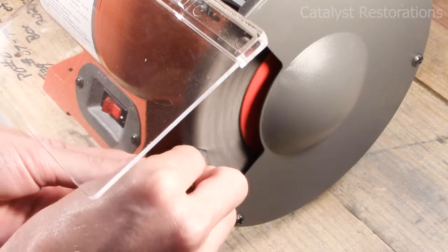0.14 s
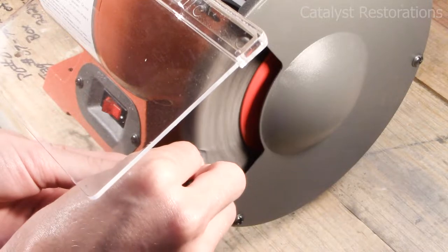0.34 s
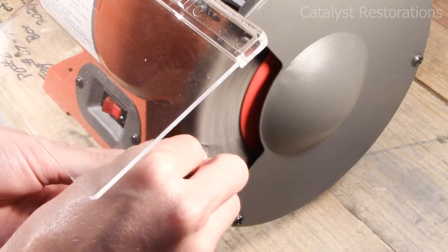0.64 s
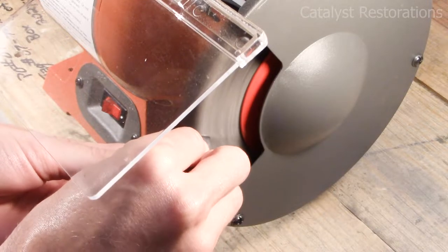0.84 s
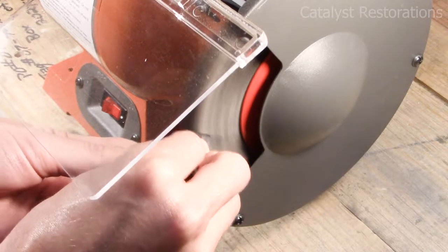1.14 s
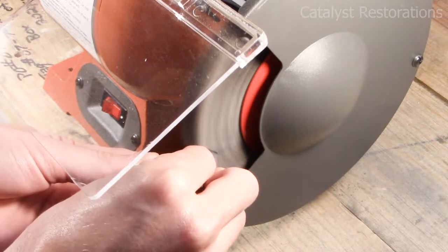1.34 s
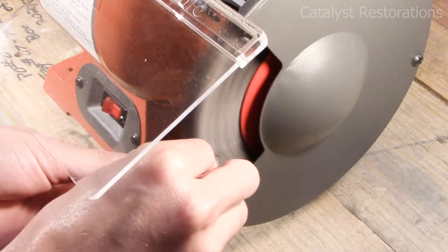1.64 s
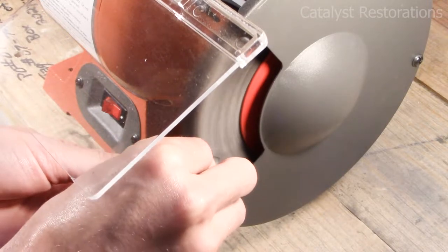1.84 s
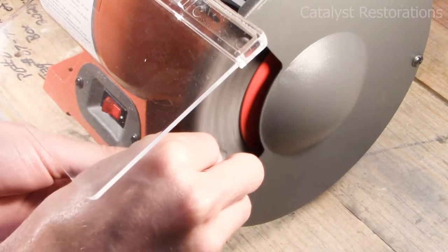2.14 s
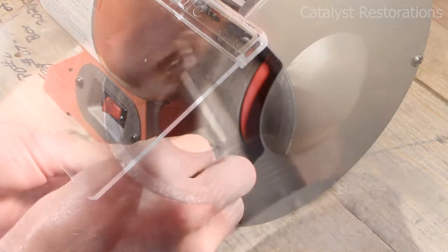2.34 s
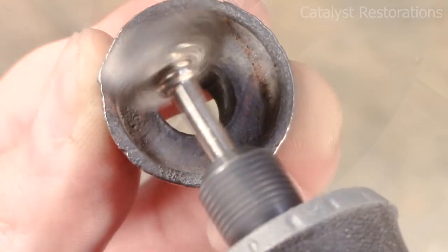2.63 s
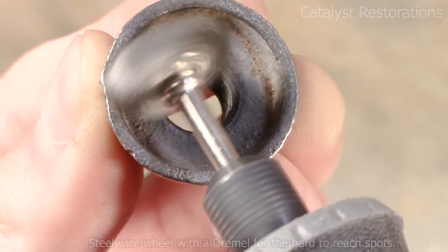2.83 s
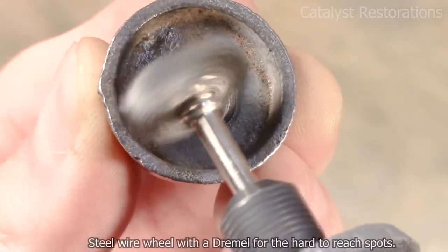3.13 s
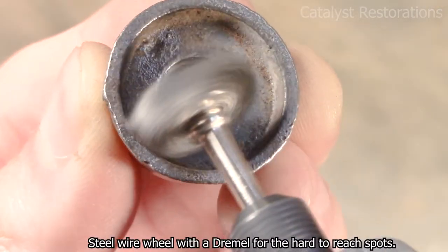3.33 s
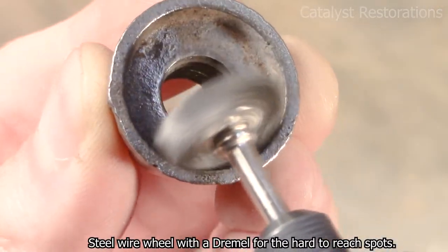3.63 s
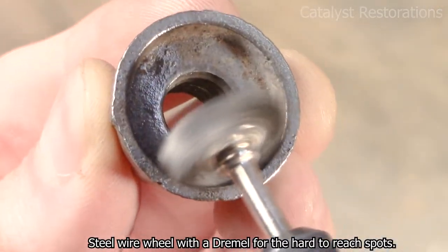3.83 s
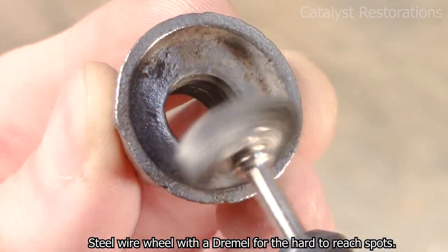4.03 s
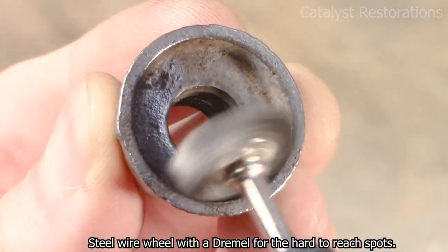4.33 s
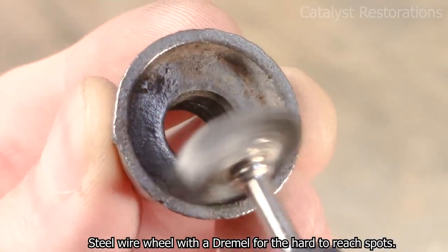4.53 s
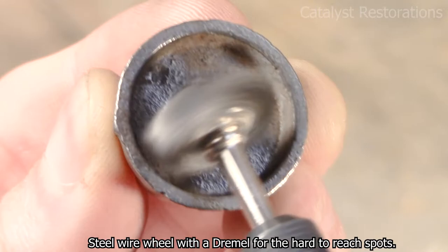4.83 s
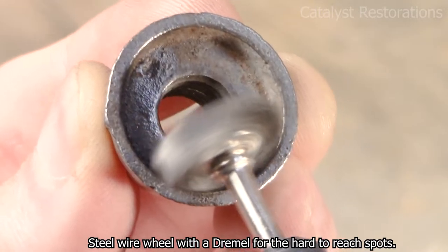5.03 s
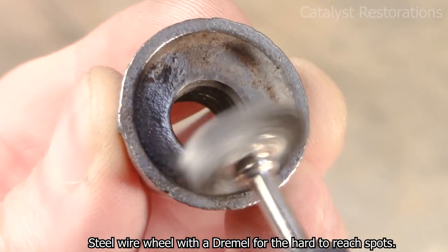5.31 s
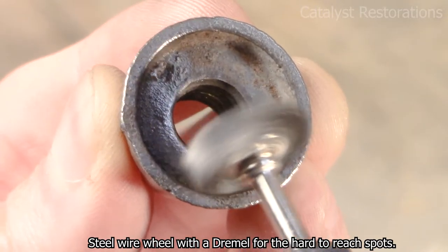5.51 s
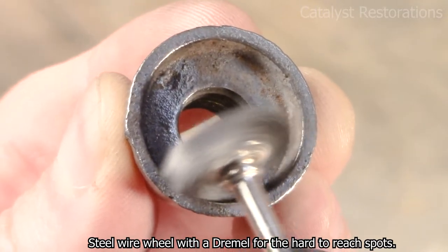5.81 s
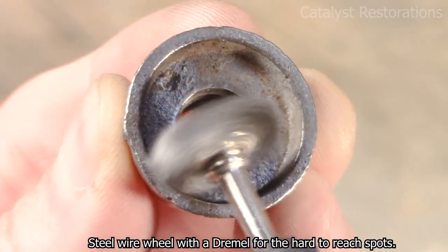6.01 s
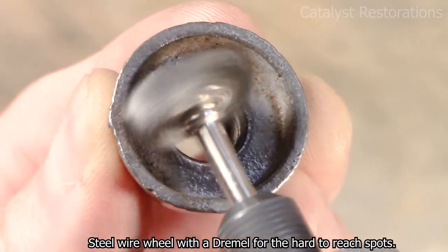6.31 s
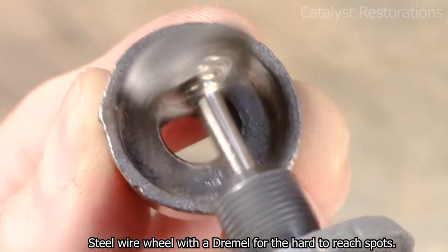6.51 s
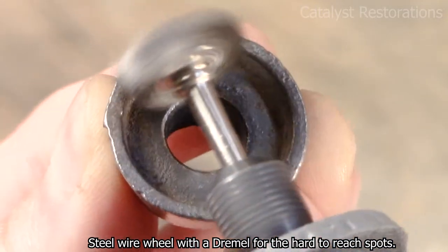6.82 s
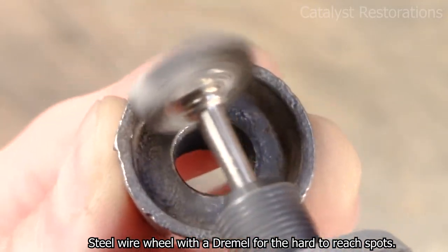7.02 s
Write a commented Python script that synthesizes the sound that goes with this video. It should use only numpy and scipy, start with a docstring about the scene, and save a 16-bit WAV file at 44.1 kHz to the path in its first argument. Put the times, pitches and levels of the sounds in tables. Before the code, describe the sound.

Close in a workshop, a bench grinder hums and whirs while a small steel part rasps on its wheel with bright gritty catches. After two seconds it crossfades into a high rotary tool whine, wavering in strength, with wires hissing and biting inside a steel cup. The brush turns harsher on the rim near the end. Soft draught puffs thump on the microphone.

```python
"""At a workshop bench, a small steel part is held against a grinder's wheel: motor hum, wheel tones, rasping grit.
The scene dissolves into a rotary tool brushing rust out of a steel cup with a wire wheel.
Rotating sources are sums of multiples of a shaft speed; rubbing is noise or tiny impacts, coloured or resonated.
The tool's fan whine sags under load and beats with its own echo, the wires hiss and bite,
and its draught now and then puffs on the microphone."""
import sys
import numpy as np
from scipy import signal
from scipy.fft import rfft, irfft
from scipy.io import wavfile
from scipy.ndimage import uniform_filter1d

SR = 44100
rng = np.random.default_rng(int(sys.argv[2]) if len(sys.argv) > 2 else 0)


def wrap_up_sound(samples):
    """Save the sound to the file named by the first command line argument, as 16-bit audio."""
    columns = np.atleast_2d(samples).T
    # keep every value between -1 and 1, then stretch to whole-number steps
    tamed = np.clip(columns, -1, 1)
    steps = np.round(tamed * 32767).astype(np.int16)
    wavfile.write(sys.argv[1], SR, steps)


N = 315754
TIME = np.arange(N) / SR
HZ = np.maximum(np.arange(N // 2 + 1) * SR / N, 1)

# rotation of the grinder wheel: (time [s], speed [turns per s])
WHEEL_SPEED = [(0.0, 55.52), (0.38, 55.02), (0.8, 55.02), (1.12, 55.69), (1.45, 55.75), (2.0, 56.03),
               (2.8, 57.55)]
# tones of the uneven wheel, before contact, settling and easing act on them:
# (multiple of the speed [1], earlier level [dB], later level [dB])
WHEEL_ORDERS = [(1, -63, -62), (2, -59, -59), (3, -59, -57), (5, -61, -58), (7, -57.5, -54),
                (8, -52.5, -62), (11, -62, -62), (12, -65, -67), (16, -63, -63), (17, -58, -57),
                (18, -55, -56), (19, -60, -58), (21, -66, -65), (24, -62, -67), (26, -57, -53),
                (27, -61, -61), (32, -57, -60), (33, -54, -58), (34, -55, -55), (35, -50, -56),
                (37, -60, -61), (38, -48.5, -52), (40, -59, -67), (44, -57, -66), (59, -60, -69),
                (62, -64, -60), (66, -67, -60), (67, -62, -57), (68, -57, -62), (70, -58, -64)]
# the balance of the wheel's tones changes: (time [s], share of the later balance [0 earlier, 1 later])
TONE_BALANCE = [(.9, 0.057), (1.2, 1)]
# pressing on the wheel: (time [s], relative shaking [dB], relative cutting [dB])
PRESS = [(0.0, -44, -46), (0.04, -40, -46), (0.59, -42.5, -47), (0.79, -42, -45.5), (1.07, -46, -47),
         (1.99, -42.5, -48.5), (2.13, -46, -48.5), (2.3, -43, -49)]
# contact with the wheel, lost as the part leaves it: (time [s], level [dB])
CONTACT = [(0, -1), (2.25, 1.5), (2.42, 2), (2.56, -6.5), (3, -4)]
# an edge of the part catches the grit: (time [s], extra grit level [dB], half length [s])
CATCHES = [(.79, 4, .03), (.93, 3, 0.048), (1.07, 2.5, 0.049), (1.23, 1.5, .02), (1.46, 4, 0.042),
           (1.58, 2.5, .02), (1.75, 2, .02), (2.02, 4, 0.029), (2.14, 2, .025)]
# resonances of the guard, the part and the part's treble: (frequency [Hz], width [Hz], relative level [dB])
GUARD = [(381, 33, 0), (610, 39, -1), (989, 110, -6.5), (1437, 106, 2), (1847, 290, -3), (2153, 164, -0.5)]
PART = [(3067, 100, -4.5), (3257, 59, -2), (3600, 100, -9.5), (3660, 54, 2.5), (3848, 54, 3.5),
        (4436, 86, 1.5), (4870, 200, -5), (5520, 230, -6.5), (5760, 120, -7), (6330, 250, -7),
        (6930, 260, -7)]
PART_TREBLE = [(7750, 160, -2.5), (8200, 140, -0.5), (8770, 150, -0.5), (9700, 220, -0.5),
               (10580, 260, -5.5), (11260, 420, -3), (12540, 350, -4), (12700, 300, -2), (14100, 460, -7)]
# spectral shapes of air in the guard, rasp and flying grit: (frequency [Hz], relative level per Hz [dB])
WINDAGE = [(30, -38), (80, -35), (140, -1), (230, -0.5), (400, 3.5), (500, 4), (660, 7.5), (800, -1.5),
           (1000, 0), (1200, -19), (1300, 4), (1620, -2), (2500, -17.5), (4000, -9.5), (9000, -16.5)]
RASP = [(700, -13.5), (1500, -1.5), (2400, 0.5), (2750, -1.5), (3300, 1.5), (5000, -3), (6500, -8.5),
        (7400, -8.5), (12000, -36)]
GRIT = [(3000, -18), (6000, 6), (7400, -16), (11000, -0.5), (13000, -6), (14400, -12), (15600, -22)]
# spray of grit: base level [dB], share of the cutting's swing [1], scale of the wheel's bounce [dB]
GRIT_DB, GRIT_FOLLOWS, BOUNCE_DB = -51.5, 0.64, 1.6
# the hand eases off: start [s], time taken [s], loss of the finer bumps per octave of the multiple [dB]
EASE_AT_S, EASE_S, EASE_LOSS_DB = 1.96, 0.18, 3
# the part settles onto the wheel: time taken [s], loss of the finer bumps at first [dB]
SETTLE_S, SETTLE_DB = .3, 4
# short reflections from bench, hand and walls: (delay [s], level [dB])
REFLECTIONS = [(.00095, -25), (.0017, -25), (.0031, -23), (.0041, -24), (.0052, -24), (.0071, -24)]

MAINS_HZ = 60
# steady motor hum: (multiple of the mains [1], level [dB])
HUM_ORDERS = [(2, -71.5), (4, -72.5), (6, -71), (12, -75)]
# growing hum at the tenth mains multiple: level at the start [dB], growth [dB per s]
HUM_DB, HUM_DB_PER_S = -60.5, 4.8

# rotation of the rotary tool, before the sag of single bites: (time [s], speed [turns per s])
TOOL_SPEED = [(2.15, 383.9), (2.4, 378.8), (2.68, 378.5), (3.44, 383.9), (3.8, 383.6), (3.99, 378.1),
              (4.49, 370.8), (4.71, 369.4), (4.98, 376.0), (5.22, 373.0), (5.31, 371.0), (5.69, 369.3),
              (5.94, 370.9), (6.22, 374.0), (6.43, 380.6), (6.63, 383.3), (6.81, 382.4), (7.16, 373.9)]
# speed under a usual load [turns per s]
WORKING_SPEED = 372
# the wires bite into the cup: (time [s], relative strength [1], half length [s])
BITES = [(4.09, 0.31, 0.039), (4.34, 0.82, 0.068), (4.54, 0.8, 0.063), (4.78, 1, .075), (5.01, 0.3, .04),
         (5.17, 0.7, .07), (5.37, 0.94, 0.064), (5.56, 0.57, .05), (5.86, 0.43, 0.14), (6.14, .6, 0.093),
         (6.48, 0.83, 0.098), (6.97, .7, .08), (7.15, .8, 0.057)]
# sag in a full bite [turns per s], span of the running mean that it is taken against [s]
BITE_SAG, RECOVER_S = .5, .25
# fan whine: direct level [dB], strength of its echo [share]
WHINE_DB, WHINE_ECHO = -48.8, .72
# mean detour of that echo [m], speed of sound [m per s]
ECHO_PATH_M, SOUND_M_PER_S = 2.7, 343
# the moving hand changes the detour: (time [s], shift [mm])
ECHO_SHIFT = [(2.25, -23.5), (2.55, -22.5), (2.85, -14.0), (3.3, -18.0), (3.85, -19.9), (4.2, -17.8),
              (4.7, -12.9), (5.25, -13.1), (5.85, -7.8), (6.4, -13.3), (6.75, 8.9), (7.1, -15.0)]
# tones of unbalance, commutator and wire chatter: (multiple of the speed [1], relative level [dB])
UNBALANCE_ORDERS = [(1, 0), (7, 4), (36, -10)]
COMMUTATOR_ORDERS = [(2, -16), (4, -13), (8, 1), (9, -9.5), (14, -13), (15, 0.5), (16, -9), (17, -12),
                     (19, -17)]
CHATTER_ORDERS = [(2, -17), (5, -2.5), (6, -1.5)]
# one row for each of those three families:
# (base level at working speed [dB], growth [dB per extra turn per s], gain in a full bite [dB])
TONE_LAWS = [(-70.5, 0.45, -5.5), (-59.5, 0.29, 4), (-70, 0.11, 12.5)]
# slow gain on all these tones: (time [s], level [dB])
TONES_LEVEL = [(2.4, 2), (3.1, 1.5), (3.7, -1.5), (6.1, 0), (6.5, 1.5), (7.15, 0.5)]
# spectral shapes of rushing air, wires and wire tips: (frequency [Hz], relative level per Hz [dB])
AIR = [(200, -43.5), (330, -29), (520, -22.5), (700, -19.5), (900, -10.5), (1150, -17), (1600, -12.5),
       (2050, -16.5), (2700, -11.5), (5100, -10), (5600, -1), (6200, -3.5), (7400, -9), (9000, -14),
       (11500, -19.5), (15500, -37)]
WIRES = [(1500, -27), (3000, -30), (3800, 10), (4500, -2.5), (5200, 6), (7000, 3.5), (8500, -3),
         (11000, -31)]
TIPS = [(7000, -17.5), (9000, -2.5), (11200, 0.5), (12500, 0), (13400, -6), (14400, -14), (15600, -20)]
# resonances of the steel cup, lowest first: (frequency [Hz], width [Hz], relative level [dB])
CUP = [(4410, 490, -2.5), (4660, 57, 5.5), (4880, 170, -1), (5900, 300, -2), (7570, 140, -5.5),
       (8800, 110, -18), (9900, 100, -16), (12000, 90, -9.5), (12580, 260, -13), (13200, 160, -19),
       (14140, 120, -21)]
# base levels of air, wires, ringing cup and wire tips [dB], unsteadiness of the hand [dB]
AIR_DB, WIRES_DB, CUP_DB, TIPS_DB, HAND_DB = -45, -57, -55.5, -61.5, 0.44
# the brush rides up onto the rim: middle [s], half length [s], rise of wires, cup, tips and air [dB]
RIM_AT_S, RIM_S, RIM_WIRES_DB, RIM_CUP_DB, RIM_TIPS_DB, RIM_AIR_DB = 6.81, .13, 3, 6, 2.5, .8
# there the cup's lowest modes sing out [dB]
RIM_RING_DB = -48.5

# puffs of draught: (time [s], relative thump [dB], relative flutter [dB], nominal length [s])
PUFFS = [(3.781, -56, -58, 0.042), (3.943, -60, -76, 0.052), (4.073, -65, -86, 0.04),
         (4.235, -70, -93, 0.055), (4.39, -60, -74, 0.045), (4.456, -61, -81, 0.022),
         (4.659, -68, -81, 0.078), (4.783, -59, -81, 0.061), (4.893, -64, -83, 0.041),
         (5.181, -55, -69, 0.034), (5.291, -57, -78, 0.054), (5.442, -61, -76, 0.05),
         (5.731, -54, -71, 0.03), (5.974, -49, -72, 0.033), (6.03, -60, -72, 0.04),
         (7.022, -65, -69, 0.027)]
# spectral shapes of thump and flutter: (frequency [Hz], relative level per Hz [dB])
PUFF_COLOUR = [(10, -19), (22, 5.5), (38, 2), (60, -0.5), (85, -10.5), (120, -35), (400, -61)]
FLUTTER_COLOUR = [(50, -23), (90, 6.5), (145, 0), (190, -25), (300, -40), (600, -65)]
CUTOFF_HZ = 15750


def from_db(db):
    """Level law: twenty decibels are a tenfold amplitude."""
    return 10 ** (np.asarray(db) / 20)


def rms_one(x):
    """Normalisation: a signal divided by its effective value has unit power."""
    return x / np.sqrt(np.mean(x ** 2) + 1e-20)


def in_time(rows):
    """Linear interpolation: each column of a time table becomes a curve, sample by sample."""
    s, *columns = np.transpose(rows)
    return [np.interp(TIME, s, c) for c in columns]


def swells(rows):
    """Superposed Gaussian pulses: a smooth rise and fall for each (time, height, half length)."""
    return sum(height * np.exp(-((TIME - s) / length) ** 2) for s, height, length in rows)


def noise():
    """White noise: independent samples carry equal power per Hz."""
    return rng.standard_normal(N)


def drift(rate):
    """Lowpass-filtered chance: two equal poles at `rate` Hz leave a slow wander of spread 1."""
    step = 40   # samples between the computed points
    r = np.exp(-2 * np.pi * rate * step / SR)
    chance = rng.standard_normal(N // step + 2002)
    slow = signal.lfilter([1], [1, -2 * r, r * r], chance)[2000:]   # the filter has settled
    return np.interp(np.arange(N) / step, np.arange(len(slow)), rms_one(slow))


def coloured(x, points):
    """Spectral shaping: weighting each frequency gives a smooth spectrum; rms 1."""
    hz, db = np.transpose(points)
    gain = from_db(np.interp(np.log(HZ), np.log(hz), db))
    return rms_one(irfft(rfft(x) * gain, N))


def resonate(x, modes):
    """Modal superposition: parallel damped resonances of alternating sign; rms 1."""
    out = 0
    for k, (hz, width, db) in enumerate(modes):
        r = np.exp(-np.pi * width / SR)
        poles = [1, -2 * r * np.cos(2 * np.pi * hz / SR), r * r]
        mode = (1 - r * r) * signal.lfilter([1, 0, -1], poles, x)
        out = out + (-1) ** k * from_db(db) * mode
    return rms_one(out)


def grains(per_s, spread_db):
    """Shot noise: tiny impacts of uneven size and either sign at random moments; rms 1."""
    struck = rng.random(N) < per_s / SR
    size = from_db(spread_db * np.clip(noise(), -2, 2))
    return rms_one(struck * size * np.sign(noise()))


def tone(turns, order, waver):
    """Harmonic of a rotation: one multiple of its angle, unsteady in strength and phase."""
    angle = 2 * np.pi * (order * turns + rng.random())
    in_phase = (1 + waver * drift(6.4)) * np.sin(angle)
    quadrature = waver * drift(10.6) * np.cos(angle)
    return np.sqrt(2 / (1 + 2 * waver ** 2)) * (in_phase + quadrature)


def wheel_face(turns, repeat, size=800):
    """Cyclic roughness: the same bumps return on every turn, mixed by power with fresh chance."""
    bumps = np.interp(turns % 1 * size, np.arange(size), rng.standard_normal(size))
    repeat = np.clip(repeat, 0, 1)
    return np.sqrt(repeat) * rms_one(bumps) + np.sqrt(1 - repeat) * noise()


def among_surfaces(x):
    """Comb interference: faint echoes off nearby surfaces ripple the spectrum of a hiss."""
    echoes = sum(from_db(db) * np.pad(x, (round(abs(delay) * SR), 0))[:N] for delay, db in REFLECTIONS)
    power = 1 + sum(from_db(2 * db) for delay, db in REFLECTIONS)
    return (x + echoes) / np.sqrt(power)


def wheel_tones(turns, shake, count=5):
    """Forced vibration: unbalance drives the lowest multiples; the higher ones grow with contact."""
    later_share, = in_time(TONE_BALANCE)
    ease_db = -EASE_LOSS_DB * np.clip((TIME - EASE_AT_S) / EASE_S, 0, 1)
    settled = from_db(-SETTLE_DB * np.clip(1 - TIME / SETTLE_S, 0, 1))
    unbalance, bumps = 0, 0
    for order, *levels in WHEEL_ORDERS:
        gain = np.interp(later_share, [0, 1], from_db(levels))
        if order <= count:
            unbalance = unbalance + gain * tone(turns, order, waver=0.13)
        else:
            eased = gain * from_db(ease_db * np.log2(order / count))
            bumps = bumps + eased * tone(turns, order, waver=0.13 + .005 * order)
    # the off-centre rotor beats against the magnetic pull, which peaks twice per mains cycle
    beat = from_db(-64) * tone(turns + 2 * MAINS_HZ * TIME, order=1, waver=0.056)
    return unbalance + from_db(-1.0) * shake * settled * bumps + beat


def grinder():
    """Abrasive contact: grit excites guard and part, above the wheel's tones and the air in the guard."""
    turns = np.cumsum(in_time(WHEEL_SPEED)[0]) / SR
    shake_db, cut_db = in_time(PRESS)
    _, usual_shake_db, usual_cut_db = np.mean(PRESS, axis=0)
    catch_db = swells(CATCHES)
    grit_db = GRIT_DB + GRIT_FOLLOWS * (cut_db - usual_cut_db) + catch_db
    contact = from_db(in_time(CONTACT)[0])

    # the bounce repeats once and three times a turn, with some chance
    pattern = 0.66 * np.cos(2 * np.pi * turns) + .5 * np.cos(6 * np.pi * turns) + 0.54 * drift(66)
    bounce_db = BOUNCE_DB * pattern
    bounce = rms_one(from_db(bounce_db))

    guard = from_db(shake_db - 6.0) * resonate(wheel_face(turns, repeat=0.16), GUARD)
    scrape = from_db(1.0) * coloured(wheel_face(turns, repeat=0.26), RASP)
    part = from_db(-2.0) * resonate(wheel_face(turns, repeat=0.31), PART)
    rasp = from_db(cut_db + 0.33 * catch_db) * (scrape + part) * rms_one(from_db(0.8 * bounce_db))

    sparks = from_db(-2.0) * coloured(grains(per_s=14000, spread_db=6.0) * bounce, GRIT)
    ringing = from_db(-1.5) * resonate(grains(per_s=9000, spread_db=5.5) * bounce, PART_TREBLE)
    spray = contact ** 0.58 * from_db(grit_db) * (sparks + ringing)

    windage = from_db(-50.0) * coloured(wheel_face(turns, repeat=0.18), WINDAGE)
    hiss = windage + contact * (guard + rasp) + spray
    shake = contact * from_db(0.48 * (shake_db - usual_shake_db))
    return wheel_tones(turns, shake) + among_surfaces(hiss)


def motor_hum():
    """Magnetic vibration: the iron of the grinder's motor sings at multiples of the mains."""
    cycles = MAINS_HZ * TIME
    drone = sum(from_db(db) * tone(cycles, order, waver=.06) for order, db in HUM_ORDERS)
    growing = from_db(HUM_DB + HUM_DB_PER_S * TIME) * tone(cycles, order=10, waver=0.14)
    return drone + growing


def faint_rumble():
    """Stationary low-frequency noise: a faint rumble lies under everything."""
    return from_db(-84) * coloured(noise(), PUFF_COLOUR)


def fan_whine(speed, turns, order=18):
    """Two-path interference: the whine meets its echo, so it swells and cancels as its pitch slides."""
    delay = (ECHO_PATH_M + in_time(ECHO_SHIFT)[0] / 1000) / SOUND_M_PER_S
    with_echo = np.abs(1 + WHINE_ECHO * np.exp(2j * np.pi * order * speed * delay))
    return from_db(WHINE_DB) * with_echo * tone(turns, order, waver=0.15)


def motor_tones(speed, turns):
    """Speed-dependent excitation: tones grow with speed; a bite steadies the shaft and makes wires chatter."""
    bite, tones = swells(BITES), 0
    families = (UNBALANCE_ORDERS, COMMUTATOR_ORDERS, CHATTER_ORDERS)
    for (db, speed_db, bite_db), orders, waver in zip(TONE_LAWS, families, (.07, .2, .35)):
        level_db = db + speed_db * (speed - WORKING_SPEED) + bite_db * bite
        family = sum(from_db(gain_db) * tone(turns, order, waver) for order, gain_db in orders)
        tones = tones + from_db(level_db) * family
    return from_db(in_time(TONES_LEVEL)[0]) * tones


def brushing(turns, count=3):
    """Impact excitation: ticks of many wires ring the cup amid rushing air, harsher on the rim."""
    rim = np.exp(-((TIME - RIM_AT_S) / RIM_S) ** 4)
    push_db = HAND_DB * drift(3)
    sweep = 1 + 0.15 * np.cos(2 * np.pi * turns)   # the brush is slightly out of round

    air = from_db(AIR_DB + RIM_AIR_DB * rim) * coloured(noise(), AIR)
    ticks = coloured(grains(per_s=20000, spread_db=0.0) * sweep, WIRES)
    wires = from_db(WIRES_DB + push_db + RIM_WIRES_DB * rim) * ticks
    # the harder the wires are pushed, the more the cup itself rings
    cup_ring = resonate(grains(per_s=8100, spread_db=5.0) * sweep, CUP)
    cup = from_db(CUP_DB + 2 * push_db + RIM_CUP_DB * rim) * cup_ring
    low_modes = resonate(grains(per_s=9000, spread_db=4.5) * sweep, CUP[:count])
    rim_ring = from_db(RIM_RING_DB) * rim * low_modes
    tip_hiss = coloured(wheel_face(turns, repeat=0.055, size=120) * sweep, TIPS)
    tips = from_db(TIPS_DB + RIM_TIPS_DB * rim) * tip_hiss
    return among_surfaces(air + wires + cup + rim_ring + tips)


def rotary_tool(presence):
    """Common shaft: fan whine, motor tones and wire brush share one speed, which sags in each bite."""
    bite = swells(BITES)
    sag = BITE_SAG * (bite - uniform_filter1d(bite, size=int(RECOVER_S * SR)))
    speed = in_time(TOOL_SPEED)[0] - sag
    turns = np.cumsum(speed * (1 + 0.00054 * drift(30))) / SR
    whine = presence ** 0.68 * fan_whine(speed, turns)
    tones = presence * motor_tones(speed, turns)
    brush = presence ** 0.74 * brushing(turns)
    return whine + tones + brush


def eddies(colour):
    """Turbulence: low coloured noise whose strength is evened out by its running power."""
    x = coloured(noise(), colour)
    return x / np.sqrt(uniform_filter1d(x ** 2, size=1000) + .03)


def draught(tail_s=0.19, tail_db=-19):
    """Turbulent pressure: soft gusts thump and flutter on the microphone; the thumps die away slowly."""
    thump_power, flutter_power = 0, 0
    for s, thump_db, flutter_db, length in PUFFS:
        gust = np.exp(-((TIME - s) / (0.42 * length)) ** 2)
        tail = from_db(2 * tail_db) * (TIME > s) * np.exp(-2 * np.abs(TIME - s) / tail_s)
        thump_power = thump_power + from_db(2 * thump_db) * (gust + tail)
        flutter_power = flutter_power + from_db(2 * flutter_db) * gust
    thumps = from_db(0.5) * np.sqrt(thump_power) * eddies(PUFF_COLOUR)
    flutters = from_db(-2.5) * np.sqrt(flutter_power) * eddies(FLUTTER_COLOUR)
    return thumps + flutters


def scene(dissolve_from=2.1, dissolve_to=2.99):
    """Sine-cosine crossfade: the grinder gives way to the rotary tool, both heard in the centre."""
    share = np.clip((TIME - dissolve_from) / (dissolve_to - dissolve_from), 0, 1)
    leaving, coming = np.cos(np.pi / 2 * share), np.sin(np.pi / 2 * share)
    grinding = leaving * (grinder() + motor_hum())
    mono = grinding + faint_rumble() + rotary_tool(coming) + draught()
    return np.stack([mono, mono])


def record(dry):
    """Lowpass filtering: a very steep slope removes the top above the cutoff."""
    return irfft(rfft(dry) / np.sqrt(1 + (HZ / CUTOFF_HZ) ** 600), N)


dry = scene()
out = record(dry)
wrap_up_sound(out)
```